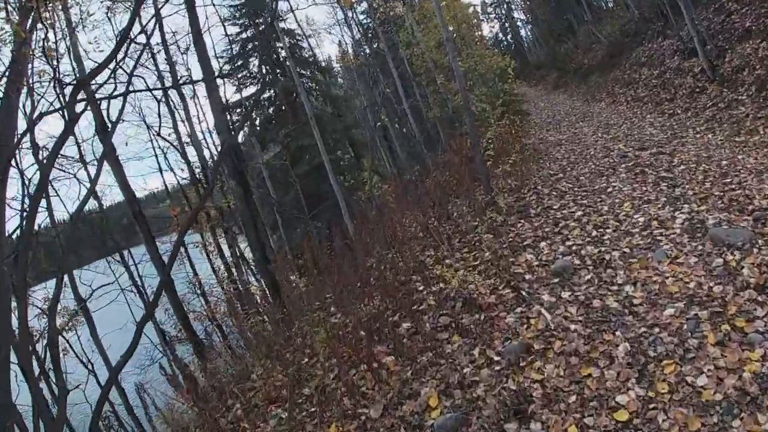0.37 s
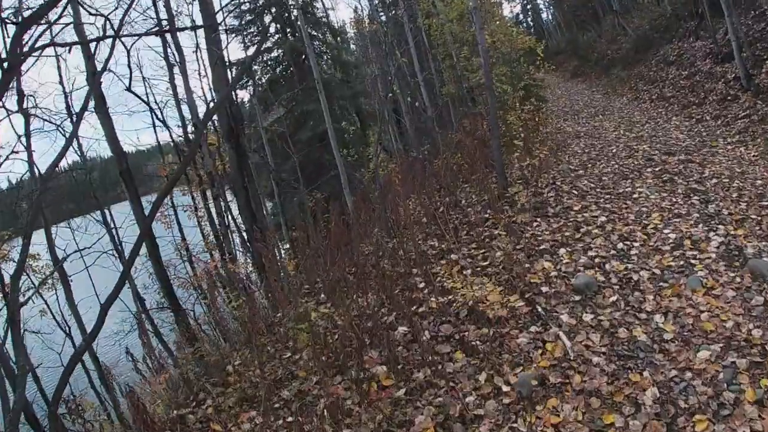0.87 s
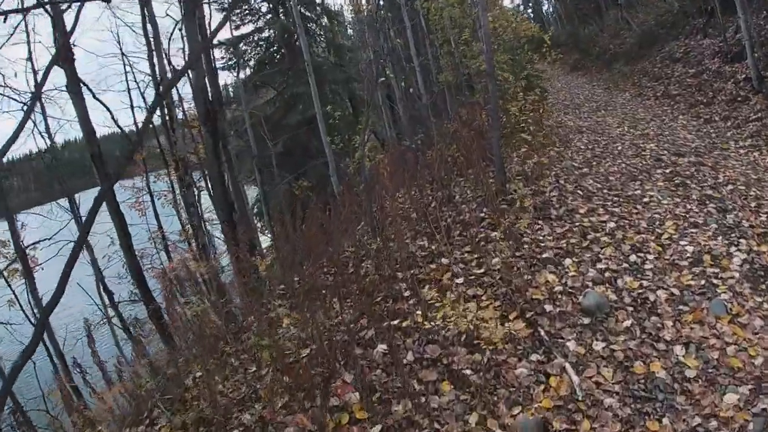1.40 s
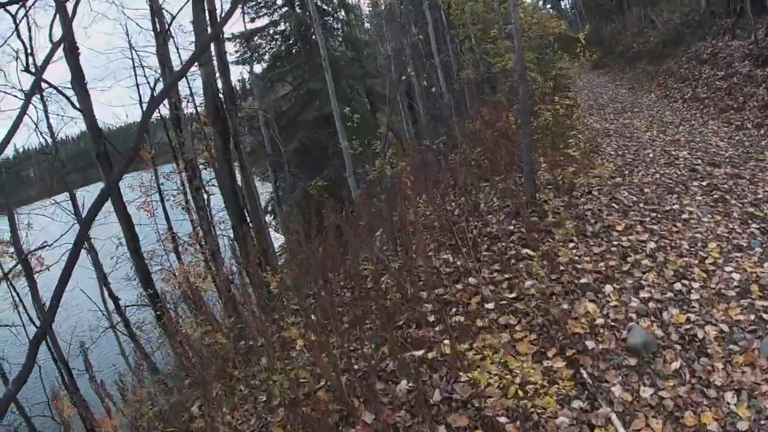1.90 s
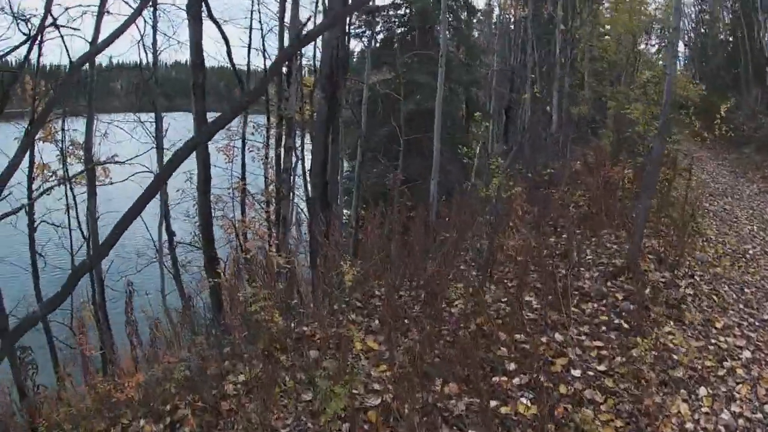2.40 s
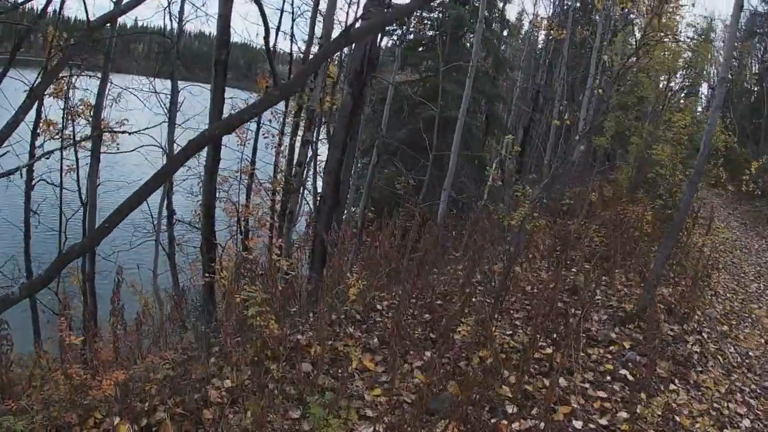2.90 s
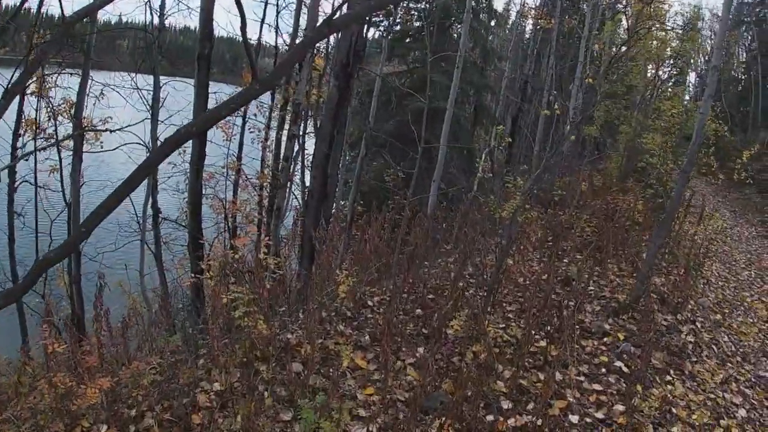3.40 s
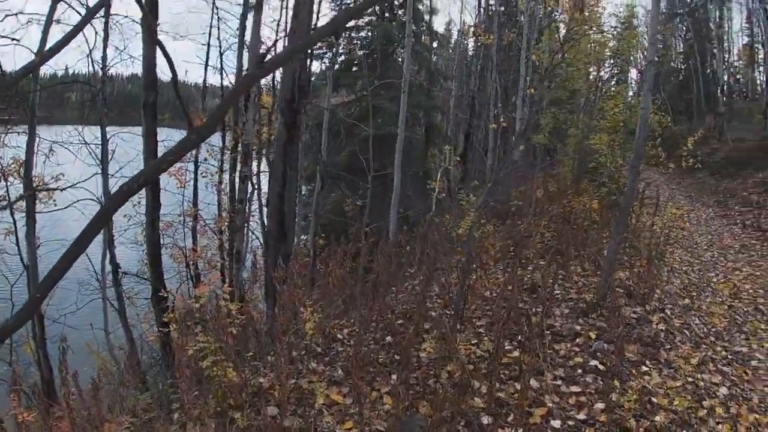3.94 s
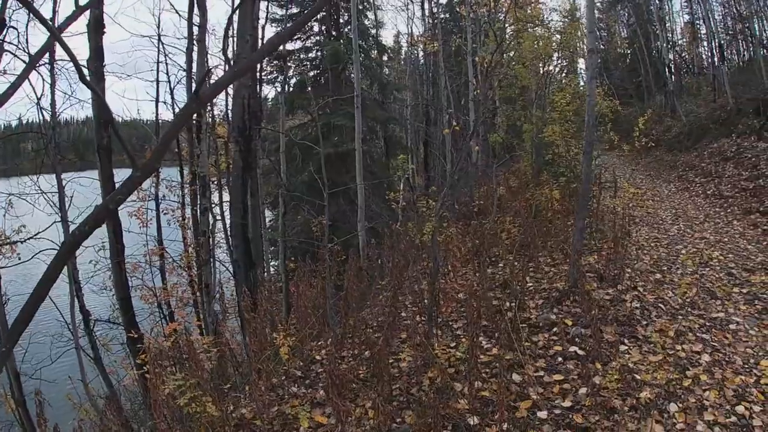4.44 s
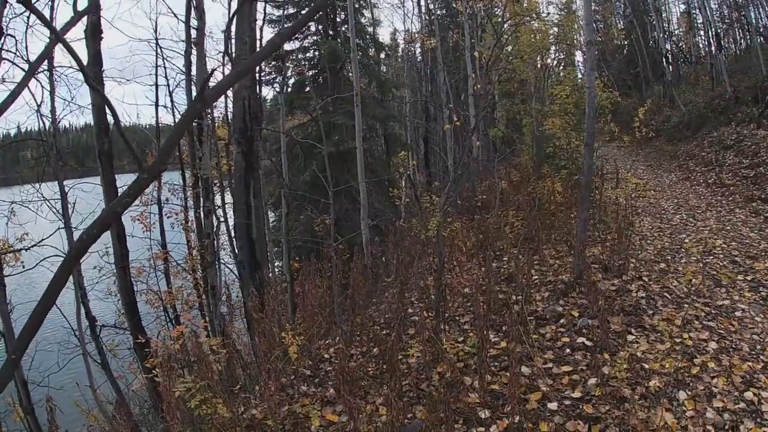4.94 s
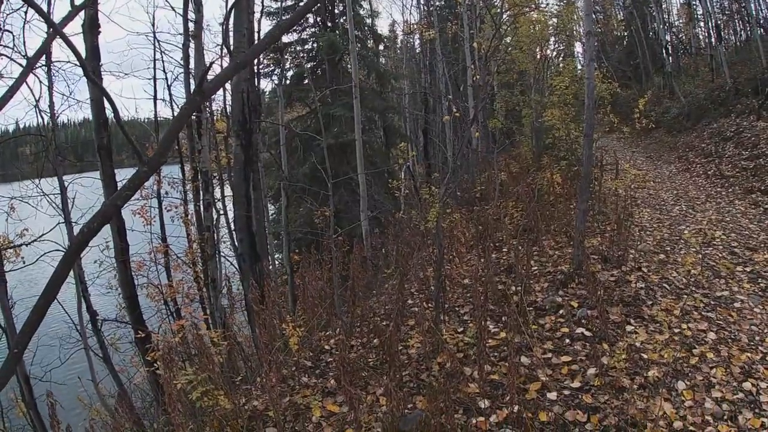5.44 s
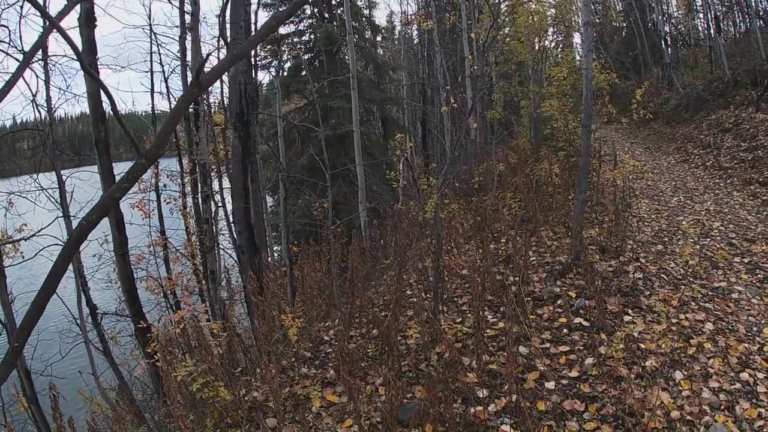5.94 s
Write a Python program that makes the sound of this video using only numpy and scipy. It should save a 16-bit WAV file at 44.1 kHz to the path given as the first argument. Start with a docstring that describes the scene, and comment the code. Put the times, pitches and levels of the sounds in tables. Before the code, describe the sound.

The echo of an earlier bark hangs as leaves crunch and a finger taps the camera. A big dog then barks in short, throaty bursts, three in the opening seconds, one after a pause, and three more close together. Wind rumbles at the microphone, strongest just after two seconds, with a loud twig snap soon following. The later part calms to echoes, small snaps and soft hiss in open woodland by water.

```python
"""A large dog barks seven times on a wooded lake trail: jittered fold pulses and puffs of air excite
gliding mouth resonances and a ringing throat. Near trunks smear each bark and the far shore returns a
long tail, both as sparse random echoes. Dry leaves rustle as dense clicks, twigs snap as ringing ticks,
a finger taps the camera, wind buffets the microphone as low noise, and the camera whines faintly."""
import sys
import numpy as np
from scipy import signal
from scipy.fft import rfft, irfft
from scipy.io import wavfile
from scipy.ndimage import uniform_filter1d

SR = 44100
rng = np.random.default_rng(int(sys.argv[2]) if len(sys.argv) > 2 else 0)


def nominal_scale(level):
    """Amplitude ratio for a level in decibels (scalar or array-like)."""
    x = np.asarray(level, float) / 20
    return 10 ** x


def transcribe(u):
    """Save the signal u as a 16-bit wav file named by the first command-line argument.

    u: samples, shape (n,) or (channels, n), limited to [-1, 1]; the rate is SR.
    q: integer samples, one column per channel.
    """
    v = np.clip(np.atleast_2d(u).T, -1, 1)
    q = np.round(v * 32767).astype(np.int16)
    wavfile.write(sys.argv[1], SR, q)


N = 267687  # samples in the scene


def evened(x):
    """Normalization: scales to rms 1."""
    return x / np.sqrt(np.mean(x ** 2) + 1e-20)


def read(points, hz):
    """Interpolation of a spectrum on a logarithmic frequency axis."""
    f, value = np.transpose(points)
    return np.interp(np.log(hz + 1), np.log(f + 1), value)


def smooth_twice(x, size):
    """Low-pass filtering by two moving averages in cascade, along the last axis."""
    return uniform_filter1d(uniform_filter1d(x, size=size), size=size)


def add(mix, start, sound):
    """Superposition: adds a sound to the mix from a given sample."""
    part = mix[start:][:len(sound)]
    part += sound[:len(part)]


def resonate(x, hz, width, order=2):
    """Heterodyne resonance: shifts the curve hz down to zero, smooths, and shifts back, with gain 1."""
    turn = np.exp(2j * np.pi * np.cumsum(hz * np.ones(len(x))) / SR)
    r = np.exp(-np.pi * width / SR)
    low = x / turn
    for _ in range(order):
        low = signal.lfilter([1 - r], [1, -r], low)
    return 2 * (turn * low).real


def band(x, lo_hz, hi_hz, order=3):
    """Band-pass filtering, normalized to rms 1."""
    sos = signal.butter(order, [lo_hz, hi_hz], "bandpass", fs=SR, output="sos")
    return evened(signal.sosfilt(sos, x))


def swells(rows, t, high_power, low_power):
    """Power addition of events, each with a straight rise and an exponential fall; returns two gains."""
    for s, db, rise, fall, other_db in rows:
        since = t - s - rise
        swell = np.where(since < 0, np.clip(1 + since / rise, 0, 1), np.exp(-np.maximum(since, 0) / fall))
        high_power = high_power + (nominal_scale(db) * swell) ** 2
        low_power = low_power + (nominal_scale(db + other_db) * swell) ** 2
    return np.sqrt(high_power), np.sqrt(low_power)


def background():
    """Spectrally shaped noise for still air and microphone hiss; frequency-modulated sines for the whine."""
    # spectral shape of air and microphone hiss: f/Hz, relative level/dB
    air_spectrum = [(60, -52), (115, -32), (145, -6), (500, 1), (1200, 1), (2200, -16.5), (4200, -19.5),
                    (7500, -19.5), (10000, -35), (13000, -41.5), (16000, -54)]
    # lines of the camera electronics: f/Hz, rms waver/Hz, level/dB
    whine_lines = [(5665, 26, -71), (11330, 70, -89), (12700, 50, -95)]
    air_db = -59
    noise, drift = rng.standard_normal((2, N))
    air = irfft(rfft(noise) * nominal_scale(read(air_spectrum, np.fft.rfftfreq(N, 1 / SR))), N)
    drift = evened(uniform_filter1d(drift, 250))
    whine = sum(nominal_scale(db) * np.sin(2 * np.pi * np.cumsum(hz + waver * drift) / SR)
                for hz, waver, db in whine_lines)
    return nominal_scale(air_db) * evened(air) + whine


def wind(t):
    """Turbulent pressure at the microphone: low band noise with lumpy thuds and an upper rumble."""
    # gusts: t/s, level/dB, rise/s, fall/s, upper rumble relative to that level/dB
    gusts = [(0.02, -50.5, 0.16, 0.15, 1.5), (.42, -44, 0.081, 0.079, -11.5), (.56, -43, 0.082, 0.055, -17),
             (.72, -37.5, 0.17, 0.074, -22), (1.35, -62, .15, 0.5, 1.5), (2.0, -45, 0.18, 0.092, 1.5),
             (2.22, -33, .19, 0.13, -24.5), (2.45, -41.5, .15, 0.14, 0), (2.95, -60, 0.31, 0.18, -30),
             (4.7, -68, 0.31, 0.09, -26), (5.4, -65, 0.32, 0.37, -27)]
    breeze_db, breeze_upper_db = -78, -88  # between gusts
    thud_db, thud_power = -6.5, 1.8  # relative to the deep rumble of the strongest gust; growth exponent
    deep_gain, upper_gain = swells(gusts, t, nominal_scale(breeze_db) ** 2, nominal_scale(breeze_upper_db) ** 2)
    deep, upper, lumps, middle = rng.standard_normal((4, N))
    lumps = nominal_scale(3.5 * band(lumps, 3, 20, order=2))
    # the thud grows faster than the gust
    thud_growth = (deep_gain / deep_gain.max()) ** (thud_power - 1)
    thud = nominal_scale(thud_db) * thud_growth * evened(lumps * band(middle, 42, 79, order=3))
    deep_rumble = deep_gain * (band(deep, 13.3, 38.3, order=4) + thud)
    return deep_rumble + upper_gain * evened(lumps * band(upper, 78, 202, order=3))


def leaves_and_treble_tails(t):
    """Shot noise: dense tiny clicks of uneven size over a soft hiss, in a high and a low band."""
    # rustles of dry leaves, and (4.06, 4.5) crackling treble tails after barks:
    # t/s, high band level/dB, rise/s, fall/s, low band over that level/dB
    crackles = [(0, -57, 0.0023, 0.044, 6), (.296, -57.5, 0.0024, 0.11, 4), (.67, -52.5, 0.023, 0.16, -1.5),
                (1.121, -79, 0.019, 0.13, 21.5), (1.387, -52, 0.04, 0.26, 5),
                (1.858, -81.5, 0.0045, 0.26, 25), (2.221, -53, 0.085, 0.33, -4),
                (2.569, -61.5, 0.007, 0.35, 6), (2.818, -50.5, 0.081, 0.08, -2),
                (3.068, -74, 0.018, 0.099, 19.5), (3.394, -70, 0.011, 0.079, 16), (4.06, -72, .06, .1, 14),
                (4.5, -70, 0.05, 0.2, 10), (5.118, -86.5, 0.033, 0.033, 23), (5.2, -74, 0.043, 0.091, 15.5)]
    stir_db = -61, -88.5  # leaves that stir all along, from start to end
    clump_db = 1.2  # rms swing of the crackle, in clumps of a few hundredths of a second
    stir_power = nominal_scale(np.interp(t, t[[0, -1]], stir_db)) ** 2
    high_gain, low_gain = swells(crackles, t, stir_power, stir_power)
    size, sign, hiss = rng.exponential(1, N), rng.standard_normal(N), rng.standard_normal(N)
    clicks = rng.random(N) < 2500 / SR  # 2500 a second on average
    crackle = evened(sign * nominal_scale(1.6 * np.minimum(size, 5)) * clicks)
    high = band(crackle + 1.6 * hiss, 4400, 9000, order=2)
    low = band(crackle + .7 * hiss, 1700, 4300, order=2)
    clumps = nominal_scale(clump_db * band(rng.standard_normal(N), 8, 60, order=2))
    return evened(clumps) * (high_gain * high + low_gain * low)


def snaps():
    """Impulse excitation of a damped resonance: each snap is a sharp tick with a short noisy ring."""
    # snaps of twigs and leaves: t/s, peak level/dB, ring f/Hz
    twigs = [(0.106, -55, 2733), (0.1338, -43, 2860), (0.2942, -37, 5370), (0.6664, -43, 1750),
             (0.787, -34, 5910), (1.3856, -45, 2945), (1.8687, -39, 3670), (2.2453, -49, 2850),
             (2.4394, -19.5, 2860), (2.578, -32, 2940), (2.659, -47, 1798), (3.0755, -49, 2320),
             (3.0952, -46, 2132), (3.128, -40, 2100), (3.157, -41, 3100), (3.1649, -37.5, 2080),
             (3.3937, -44, 2240), (3.4194, -27.5, 2860), (4.2287, -36, 1789), (4.6948, -46, 3300),
             (5.1383, -43, 1842), (5.256, -44, 2770), (5.2822, -39, 1890), (5.3264, -47, 1940),
             (5.3892, -43, 2280)]
    out, t = np.zeros(N), np.arange(4000) / SR
    for (s, db, hz), noise in zip(twigs, rng.standard_normal((len(twigs), len(t)))):
        crack = noise * np.exp(-t / .0006)
        burst = crack + .4 * noise * nominal_scale(-60 * t / .045)
        # bigger snaps crack wider: more of the broad burst beside the ring
        crack_db = -20 + 0.96 * (db + 35)
        tick = resonate(burst, hz, .7 * hz) + nominal_scale(crack_db) * smooth_twice(burst, 3)
        add(out, round(s * SR), nominal_scale(db) * tick / abs(tick).max())
    return out


def knock():
    """Impulse response of a heavily damped body: a finger tap gives one low push in a Gaussian envelope."""
    # taps on the camera body: t/s, peak level/dB, f/Hz
    taps = [(.153, -27, 280)]
    out, t = np.zeros(N), np.arange(4000) / SR - .005
    for s, db, hz in taps:
        add(out, round(s * SR), nominal_scale(db) * np.cos(2 * np.pi * hz * t) * np.exp(-(t / .0022) ** 2))
    return out


def echo(x, t60s, wait, length):
    """Diffuse reverberation: sparse taps of random sign build up, each band decaying at its own rate."""
    taps = np.zeros(length)
    at = np.arange(0, length - 20, 20)
    taps[at + rng.integers(0, 20, len(at))] = rng.choice([-1., 1.], len(at))
    hz, t, z = signal.stft(taps, SR, nperseg=256)
    z = z * nominal_scale(-60 * t / read(t60s, hz)[:, None]) * (1 - np.exp(-(t / wait) ** 2))
    tail = signal.istft(z, SR, nperseg=256)[1]
    return signal.fftconvolve(x, tail / np.linalg.norm(tail))[:len(x)]


def bark(row, voice, jaw, locked):
    """Source-filter voice: fold pulses and puffs of air pass a moving mouth; the throat rings on its own."""
    # open-mouth resonances that move with the bark: width/Hz, level/dB
    mouth_modes = [(265, 6.5), (233, 7), (367, 5.5)]
    # steady upper throat resonances: f/Hz, width/Hz, level before the bark's own offset/dB
    upper_modes = [(1910, 445, -5), (2340, 610, -13), (3130, 1700, -36)]
    # breath hiss resonances: f before the size factor/Hz, width/Hz, relative level/dB
    hiss_modes = [(4250, 500, -4), (5000, 550, 0), (7000, 2600, -11)]
    _, attack, voiced, top_db, upper_db = row
    top_hz, top_s, ring_from_hz, ring_to_hz, ring_db = voice
    second_from_hz, third_from_hz, hiss_db, hiss_size = jaw
    release_s = .13
    t = np.arange(0, voiced + release_s, 1 / SR)
    after = np.maximum(t - voiced, 0)  # time since let-go

    # effort: swell, slow tiring (dB/s), release (dB/s)
    swell = np.minimum(t / attack, 1) ** 1.44
    effort = swell * nominal_scale(top_db - 17.5 * np.maximum(t - attack, 0) - 313 * after)

    # pitch: climbs to the top, settles towards the easy note, drops after let-go (rates in Hz/s)
    settle_hz, settle_s, lowest_hz = 347.5, .035, 141.5
    hz = top_hz - 1400 * np.maximum(top_s - t, 0) - 2800 * after
    hz = hz - (top_hz - settle_hz) * (1 - np.exp(-np.maximum(t - top_s, 0) / settle_s))
    hz = uniform_filter1d(np.maximum(hz, lowest_hz), size=600)

    # the ring slides up into its note and gives way to the folds around the top of the pitch
    ring_hz = ring_from_hz + (ring_to_hz - ring_from_hz) * np.minimum(t / voiced, 1.2)
    ring_hz = ring_hz * (1 - .25 * np.exp(-t / 0.0179))
    ring_db = ring_db - 3.5 * np.exp(-((t - top_s) / 0.023) ** 2)

    # as the jaw opens two resonances glide (Hz/s) and the breath hiss grows (dB/s)
    second_hz, third_hz = second_from_hz + 240 * t, third_from_hz - 200 * t
    hiss_db = hiss_db + 42.5 * np.minimum(t, voiced)

    # the folds lock best from the easy note upwards
    rough = .9 - (.9 - locked) * np.minimum(hz / settle_hz, 1) ** 3
    draws = rng.standard_normal((SR // 2, 14))[:len(t)].T
    jitter, shimmer, air, ring_air, wander, *flutter = draws
    hz = hz * (1 + .018 * evened(smooth_twice(wander, 500)))
    turns = np.cumsum(hz * (1 + 0.0669 * rough * evened(uniform_filter1d(jitter, 130)))) / SR
    # uneven strength of each partial
    flutter = nominal_scale(2.8 * evened(smooth_twice(flutter, 600)))
    folds = sum(flutter[k - 2] * np.cos(2 * np.pi * k * turns) for k in range(2, 11))
    # pulse strength also wanders over a few cycles
    folds = folds * nominal_scale(2.5 * evened(uniform_filter1d(shimmer, 500)))
    puffs = evened((0.078 + np.exp(-(turns % 1) / 1.03)) * air)
    drive = np.sqrt(1 - rough) * folds + 4 * np.sqrt(rough) * puffs

    centres = 1.157 * ring_hz, second_hz, third_hz
    moving = [(f, w, db) for f, (w, db) in zip(centres, mouth_modes)]
    upper = [(f, w, db + upper_db) for f, w, db in upper_modes]
    # neighbouring resonances alternate in sign
    mouth = sum((-1) ** k * nominal_scale(db) * resonate(drive, f, w) for k, (f, w, db) in enumerate(moving + upper))
    mouth = band(mouth, 332, 5000, order=3)

    # the ring is a tone that wavers; the throat takes a moment to start ringing
    wobble = evened(resonate(ring_air, ring_hz, 95))
    ring = evened(np.cos(2 * np.pi * np.cumsum(ring_hz) / SR) + .4 * wobble)
    ring = ring * (1 - np.exp(-t / 0.01))

    gape = hiss_size * (0.886 + .1 * hz / hz.max())  # hiss resonances rise and fall with the pitch
    hiss = evened(sum((-1) ** k * nominal_scale(db) * resonate(puffs, f * gape, w)
                      for k, (f, w, db) in enumerate(hiss_modes)))
    throat = nominal_scale(-4) * (mouth + nominal_scale(ring_db) * ring + nominal_scale(hiss_db) * hiss)

    # the fundamental strengthens by 9 dB per octave and outlasts the release
    first_db = -21 + 9 * np.log2(hz / top_hz) + 231 * after
    fundamental = nominal_scale(first_db) * np.cos(2 * np.pi * turns)
    sound = effort * (throat + fundamental) * np.minimum((t[-1] - t) / .03, 1)
    return signal.sosfilt(signal.butter(4, 105, "highpass", fs=SR, output="sos"), sound)


def dog():
    """Direct sound plus reverberation: all barks with the echoes of near trunks and far shore."""
    # barks, the first ending before the start and heard only as echo:
    # t/s, attack/s, voiced length/s, effort level/dB, offset of the upper throat resonances/dB
    barks = [(-.42, 0.21, .14, -11, -6), (.368, .075, 0.14, -19, 1), (0.869, 0.063, 0.13, -19, 2),
             (1.432, 0.12, 0.12, -15.5, -6.5), (2.41, 0.033, 0.099, -15.5, -0.5),
             (3.608, 0.039, .125, -16, 1), (3.834, 0.077, 0.16, -16, -1.5), (4.306, 0.036, .12, -19.5, -2)]
    # voice of each bark: nominal top pitch f/Hz, reached after t/s, throat ring f at start/Hz,
    # ring f at let-go/Hz (both before the slide), ring level relative to the mouth before its dip/dB
    voices = [(345.6, .08, 620, 545, -10), (358.3, .1, 570, 490, -11), (374.2, 0.077, 540, 500, -3),
              (365, 0.12, 545, 495, -7), (410.7, 0.02004, 520, 575, -7), (392.6, 0.087, 610, 460, -3.5),
              (369.4, 0.1, 530, 490, -10.5), (342.6, .09, 585, 620, 1.5)]
    # jaw of each bark at its start: second resonance f/Hz, third resonance f/Hz,
    # breath hiss level relative to the mouth/dB, size factor of the hiss resonance frequencies
    jaws = [(935.3, 1550, -23, 2.9), (928, 1507, -29, 1.036), (875, 1400, -28.5, 1.014),
            (884, 1457, -33, 0.996), (887, 1400, -32.5, .9), (935, 1510, -34, 1.02),
            (913, 1554, -35.5, 0.99), (917, 1486, -33.5, .98)]
    # roughness of each bark: share of noise (0-1) from the easy note upwards
    roughness = [.6, .3, .45, .38, .33, .55, .27, .42]
    # decay among near trunks: f/Hz, t60/s
    trees_t60 = [(250, 0.78), (700, 0.61), (1700, 0.49), (5000, 0.56)]
    # decay from far bank and slope: f/Hz, t60/s
    shore_t60 = [(250, 3.95), (700, 2.57), (1700, 2.43), (5000, 1.42)]
    trees_db, shore_db = -8, -23.5  # relative to the direct bark
    lead = SR // 2  # room for the bark ahead of the start
    direct = np.zeros(N + lead)
    for row, voice, jaw, locked in zip(barks, voices, jaws, roughness):
        add(direct, round(row[0] * SR) + lead, bark(row, voice, jaw, locked))
    trees = nominal_scale(trees_db) * echo(direct, trees_t60, wait=0.0019, length=SR)
    shore = nominal_scale(shore_db) * echo(direct, shore_t60, wait=0.056, length=3 * SR)
    return (direct + trees + shore)[lead:]


def scene():
    """Superposition at a microphone that low-passes the outside sounds; hiss and whine come after."""
    t = np.arange(N) / SR
    outside = dog() + leaves_and_treble_tails(t) + snaps() + knock() + wind(t)
    housing = signal.butter(4, 8200, fs=SR, output="sos")
    heard = signal.sosfilt(housing, outside) + nominal_scale(-15.5) * outside
    return (heard + background())[None]


def top_cut(x):
    """Nothing passes above the cut-off."""
    return signal.sosfilt(signal.butter(12, 15650, fs=SR, output="sos"), x)


def record(dry):
    """Signal chain: the finished mix passes through the camera."""
    return top_cut(dry)


dry = scene()
out = record(dry)
transcribe(out)
```